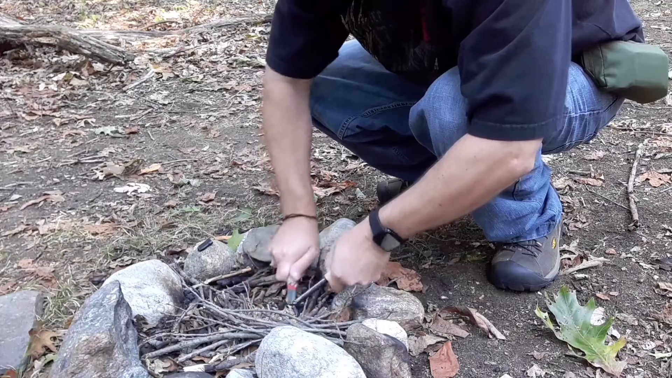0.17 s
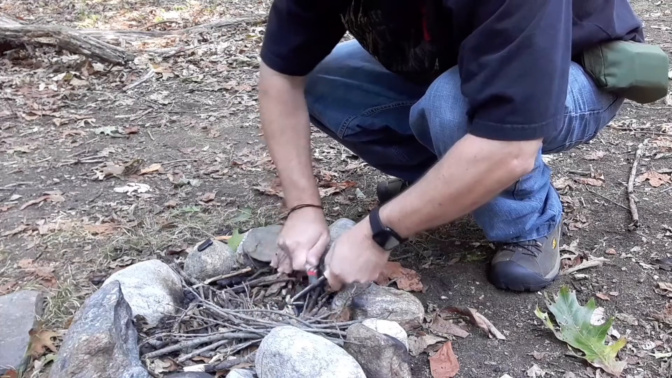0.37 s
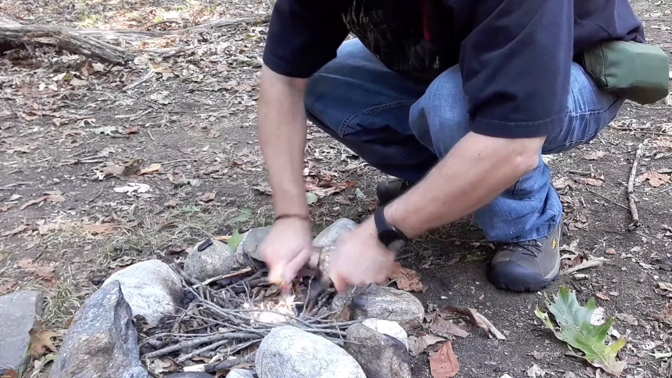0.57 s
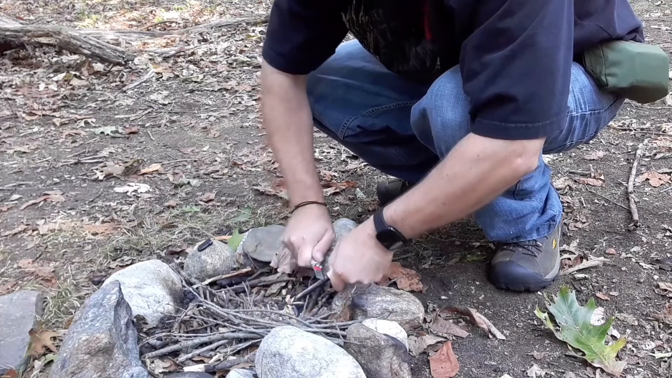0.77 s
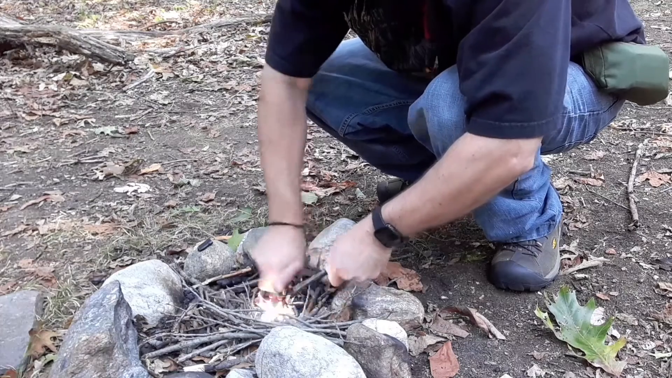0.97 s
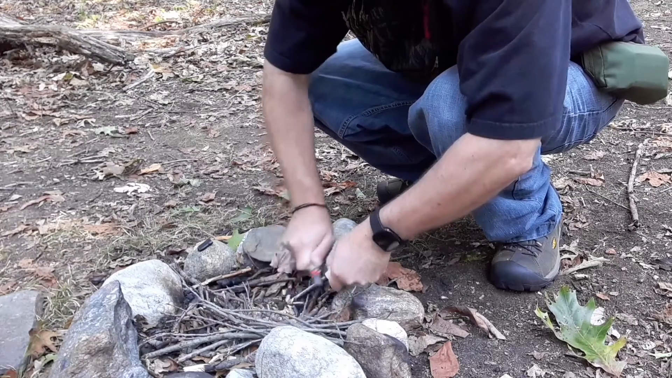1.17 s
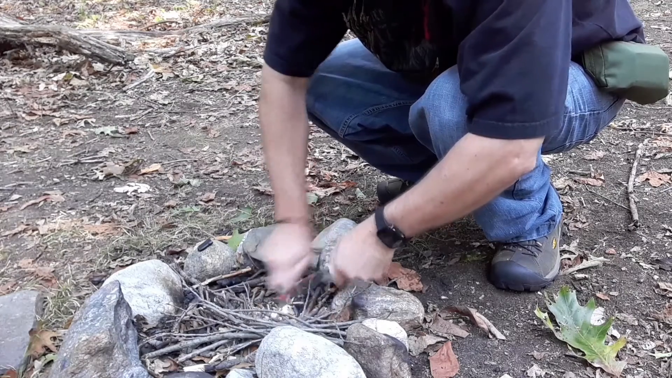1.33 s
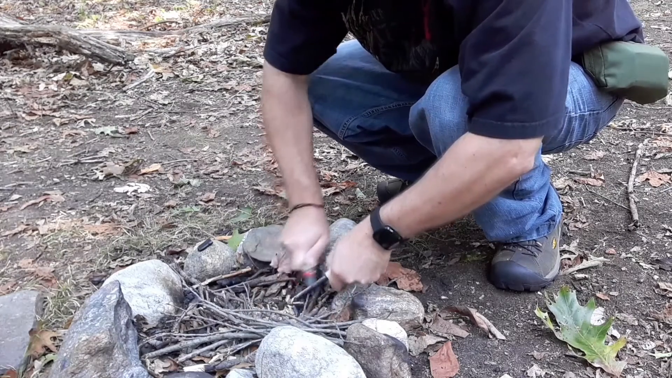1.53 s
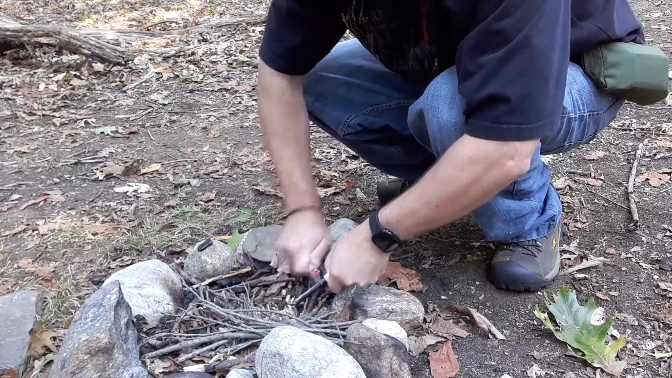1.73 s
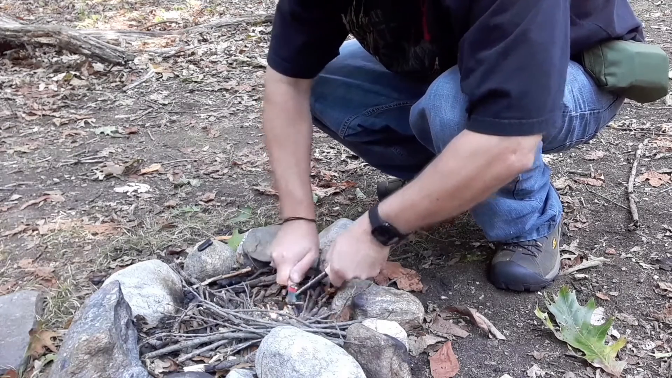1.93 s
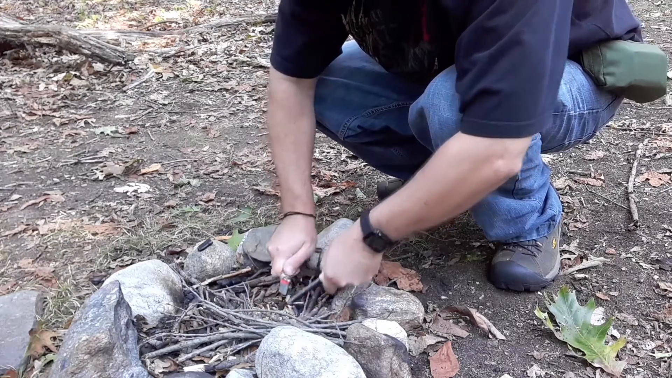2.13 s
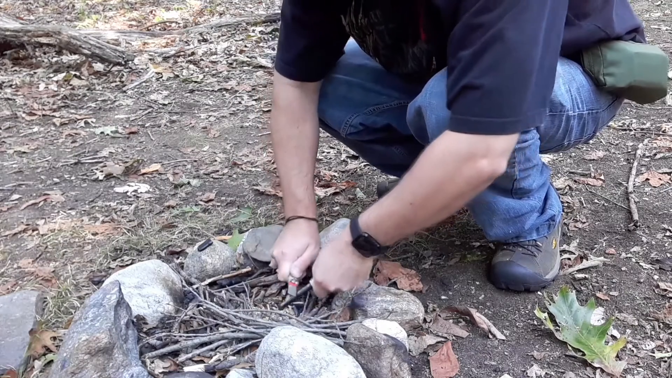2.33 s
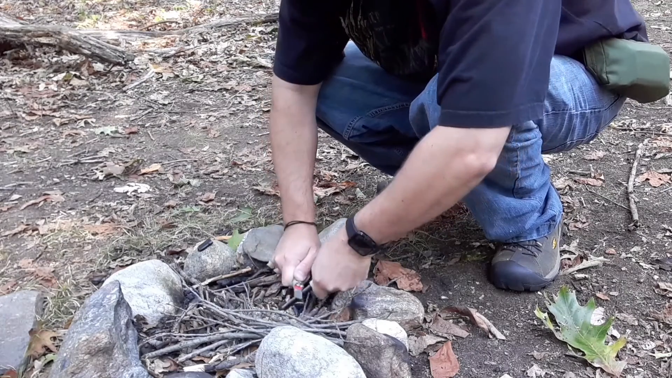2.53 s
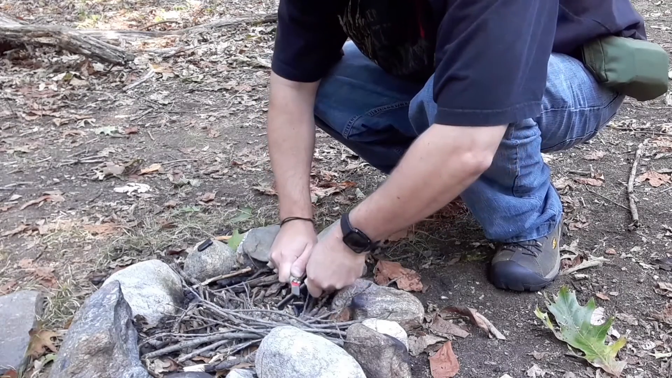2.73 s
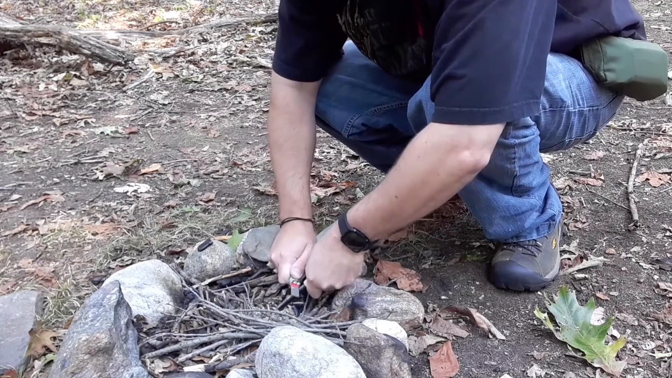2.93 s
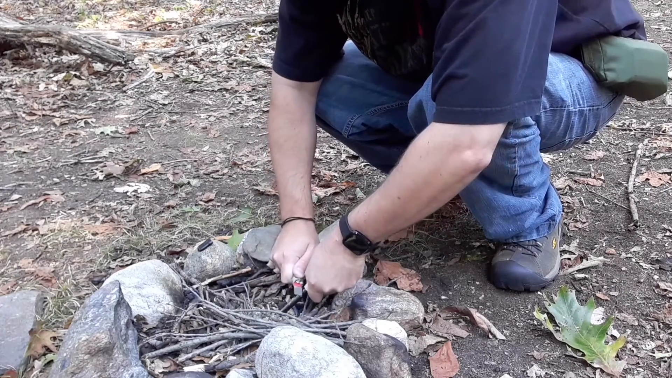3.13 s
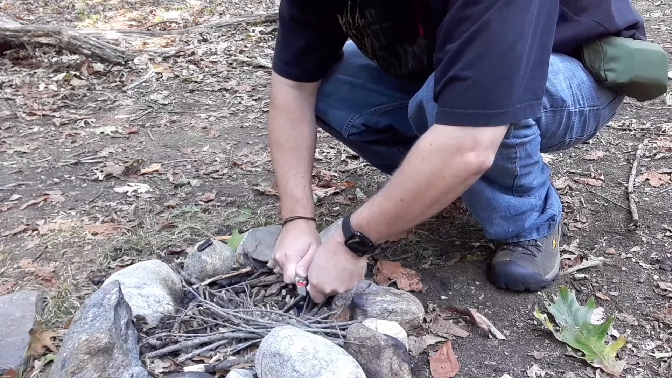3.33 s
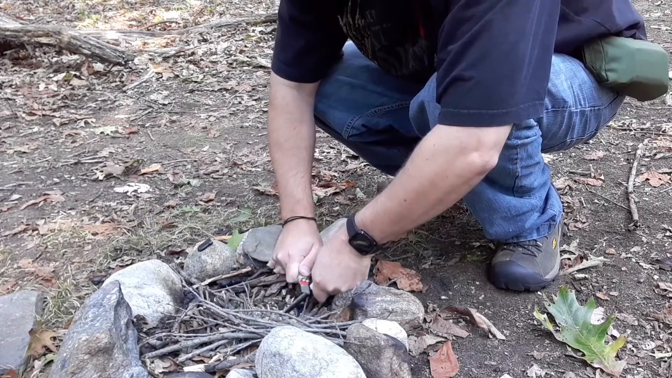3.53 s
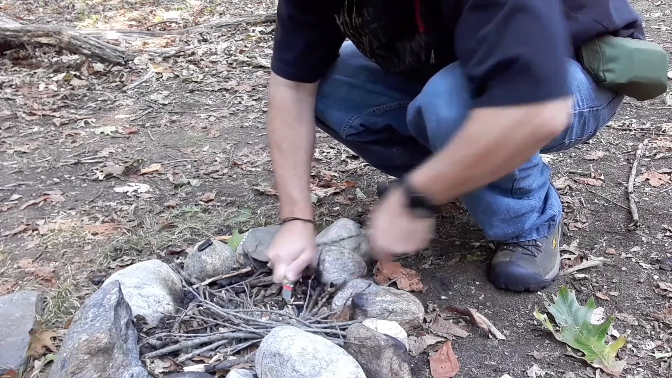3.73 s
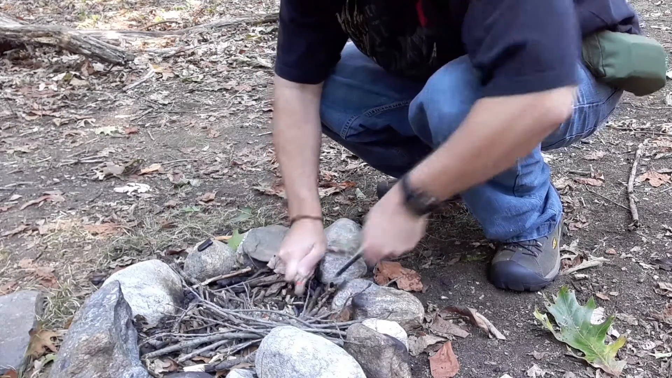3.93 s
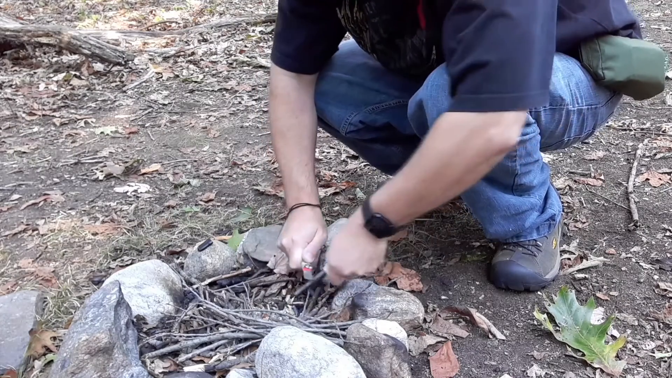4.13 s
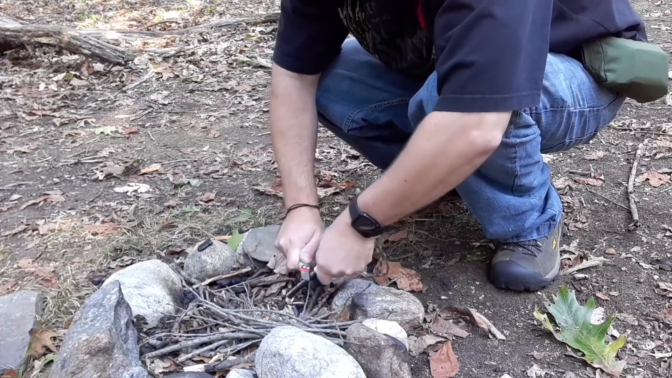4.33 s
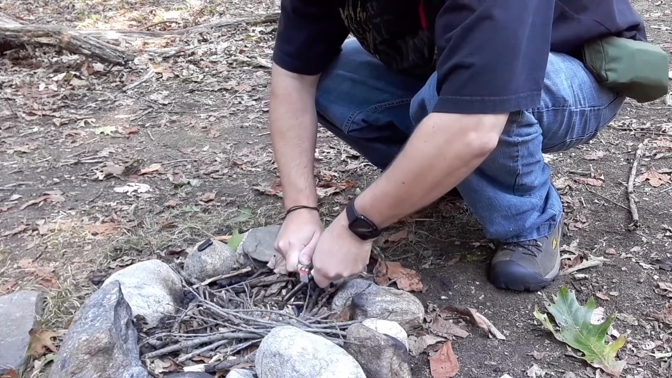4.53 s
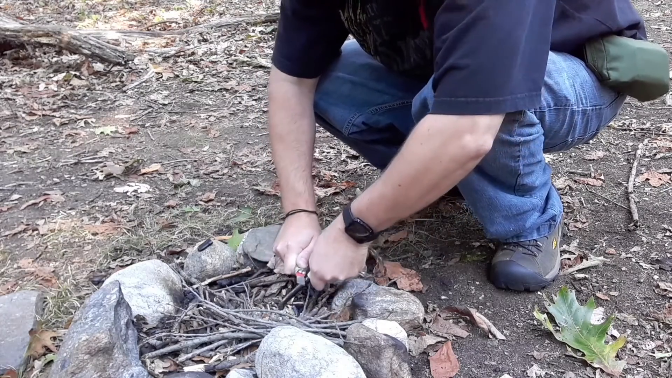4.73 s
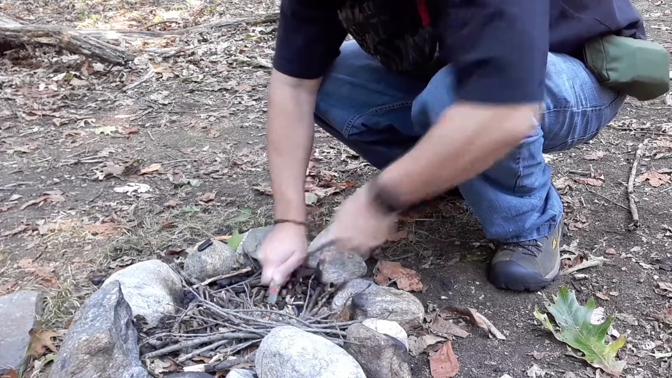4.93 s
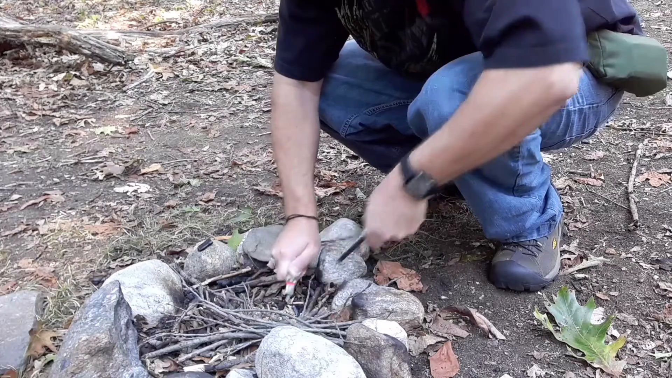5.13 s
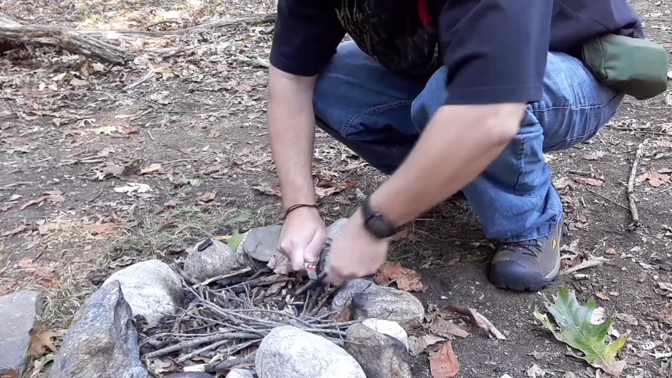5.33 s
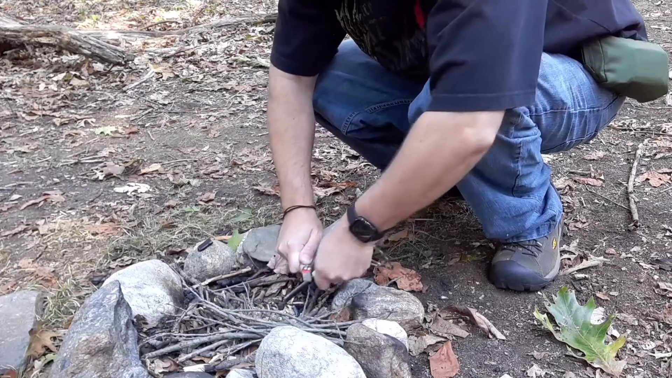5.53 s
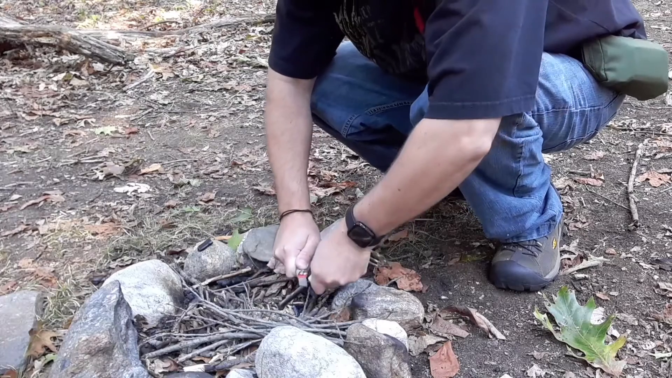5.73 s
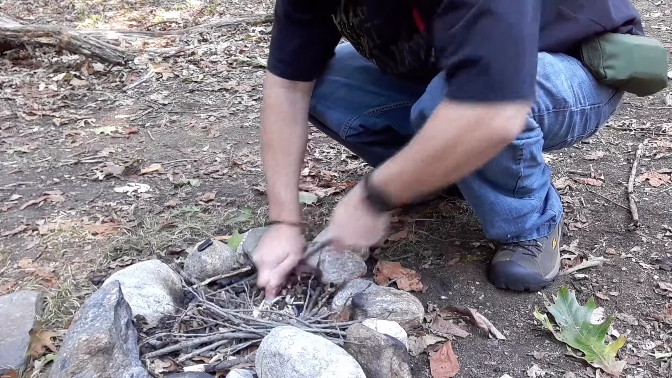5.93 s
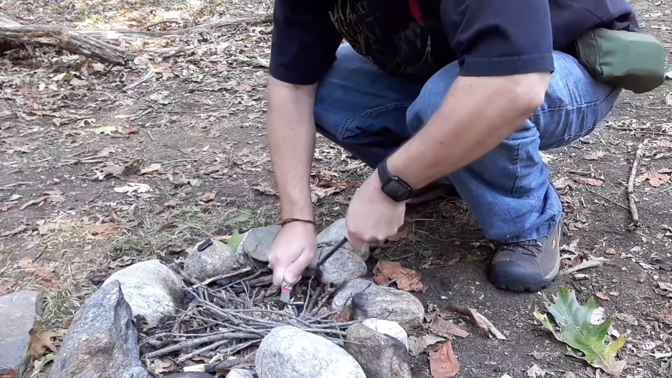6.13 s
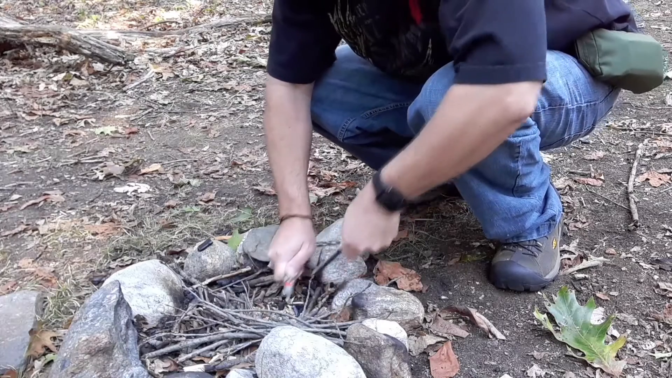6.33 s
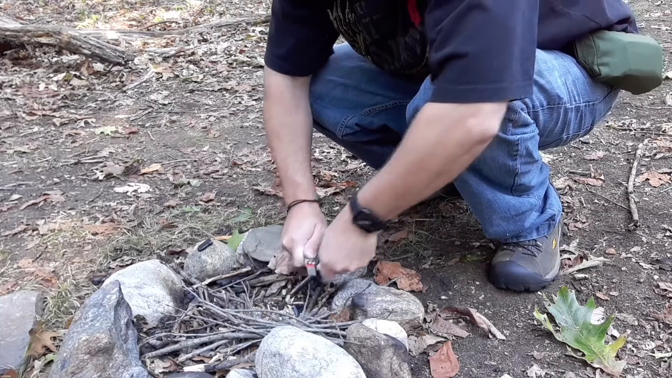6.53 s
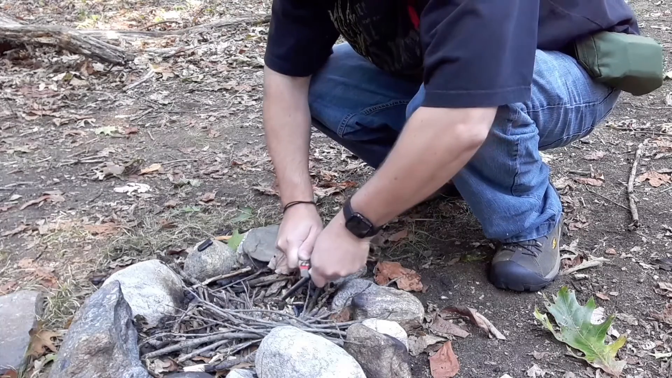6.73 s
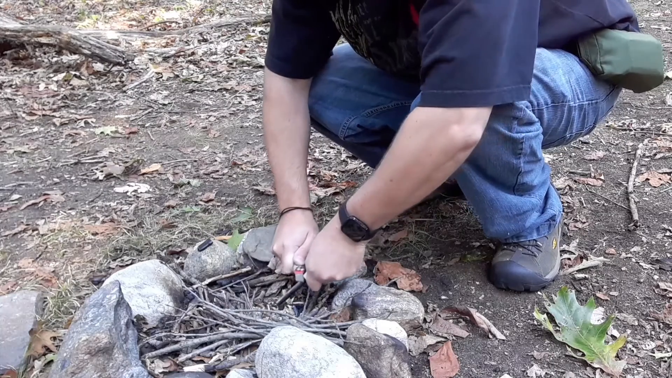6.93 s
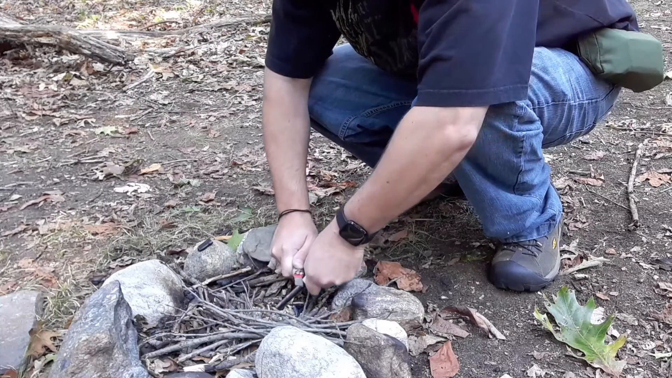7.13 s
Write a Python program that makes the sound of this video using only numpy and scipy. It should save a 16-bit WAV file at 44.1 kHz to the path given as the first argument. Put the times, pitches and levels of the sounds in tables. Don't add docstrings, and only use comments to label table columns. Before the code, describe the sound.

Short, bright metallic zips of a striker on a fire-starting rod, five quick then three widely spaced, over a constant late-summer insect chorus.

```python
import sys
import numpy as np
from scipy import signal
from scipy.io import wavfile
from scipy.ndimage import uniform_filter1d

SR = 44100
rng = np.random.default_rng(int(sys.argv[2]) if len(sys.argv) > 2 else 0)


def rack_gain(trim_db):
    fader = np.asarray(trim_db, float)
    return 10 ** (fader / 20)


def materialize(psi):
    bounded = np.clip(np.atleast_2d(psi).T, -1, 1)
    quanta = np.round(bounded * 32767).astype(np.int16)
    wavfile.write(sys.argv[1], SR, quanta)


N = 317079
TOP_HZ = 18500

# start_s, length_s, chatter_db, grit_db, first_slips_per_s
PUSH_BITES = [
    (.007, .029, -12, -24, 1200),
    (.482, .024, -17.5, -33.5, 1260),
    (.932, 0.02485, -13.5, -24.5, 1400),
    (1.325, .019, -14, -20.5, 1540),
    (1.777, .025, -14.5, -24.5, 1330),
]
PULL_BITES = [
    (3.630, .021, -15, -22.5, 1830),
    (4.881, .022, -16, -22.5, 1820),
    (5.869, 0.023, -13.5, -23.5, 1882),
]
RESET_BITES = [
    (1.153, .016, -33, -33, 1696),
    (1.562, .012, -37, -40.5, 1716),
]


def rms_one(x):
    return x / np.sqrt(np.mean(x ** 2) + 1e-20)


def column(tables, index):
    t, value, gate = np.arange(N) / SR, np.zeros(N), np.zeros(N)
    for rows in tables:
        rows = np.array(rows)
        inside = slice(max(int(rows[0, 0] * SR), 0), int(rows[-1, 0] * SR))
        value[inside] = np.interp(t[inside], rows[:, 0], rows[:, index])
        gate[inside] = 1
    return value, gate


def level(tables, index, size=44):
    gain = np.zeros(N)
    for rows in np.array(tables):
        i = np.arange(max(int(rows[0, 0] * SR), 0), int(rows[-1, 0] * SR))
        gain[i] += rack_gain(np.interp(i / SR, rows[:, 0], rows[:, index]))
    return uniform_filter1d(gain, size=size)


def at_hz(points, hz):
    points = np.array(points)
    return np.interp(np.log(hz), np.log(points[:, 0]), points[:, 1])


def drift(rate):
    r = np.exp(-2 * np.pi * rate / SR)
    wander = signal.lfilter([1], [1, -2 * r, r * r], rng.standard_normal(N + SR))
    return rms_one(wander[SR:])


def resonance(x, hz, width_hz):
    r = np.exp(-np.pi * width_hz / SR)
    zeros = np.array([1, 0, -1]) * (1 - r * r) / 2
    poles = [1, -2 * r * np.cos(2 * np.pi * hz / SR), r * r]
    return signal.lfilter(zeros, poles, x + 1e-18)


def band(x, low_hz, high_hz, order=2):
    edges_hz = [low_hz, min(high_hz, .45 * SR)]
    return signal.sosfilt(signal.butter(order, edges_hz, "band", fs=SR, output="sos"), x)


def grains(per_s, spread_db):
    sizes = rack_gain(spread_db * np.minimum(rng.exponential(1, (2, N)), 5)) * rng.choice([-1, 1], (2, N))
    return sizes * (rng.random((2, N)) < per_s / SR)


def pair(streams, alike):
    alike = np.clip(alike, -1, 1)
    side = np.sqrt(1 - alike) * streams[1] * np.array([[1], [-1]])
    return np.sqrt(1 + alike) * streams[0] + side


def strokes():
    dig_s, let_go_s, edge_db = .004, .006, -24
    judder_hz, judder_db, judder_lag_s = 98.93, 2, .005
    catch_slips = 260
    push, pull, reset = (24, 0.95, 12, 13, 1.5, -0.5), (-16, 0.1, -2, 8.5, 4.5, 3.3), (-4.5, .1, 1.5, 3, 6, -14)
    noise_shares = [(.3, .5), (.25, .95), (.6, 1.1)]
    spans = []
    for rows, law, shares in zip([PUSH_BITES, PULL_BITES, RESET_BITES], [push, pull, reset], noise_shares):
        glide, peak, swell_db, fade_db, grit_fade_db, fine_db = law
        for s, length, chatter_db, grit_db, slips in rows:
            t = np.linspace(-dig_s, length + let_go_s, num=200)
            along = np.clip(t / length, 0, 1)
            shake = judder_hz * (t - judder_lag_s)
            digging = np.clip(-t / dig_s, 0, 1)
            letting_go = np.clip((t - length) / let_go_s, 0, 1)
            edge = edge_db * np.maximum(digging, letting_go)
            grit = grit_db - grit_fade_db * (along - .5) + edge
            effort = np.interp(along, [0, np.clip(peak, 0, 1), 1], [-swell_db, 0, -fade_db])
            chatter = chatter_db + effort + edge + judder_db * np.cos(2 * np.pi * shake)
            catch = catch_slips * ((shake + .5) % 1 - .5)
            rate = slips + 1000 * glide * length * along + catch
            noise_share = np.interp(along, [0, 1], shares)
            spans.append(np.transpose([s + t, chatter, rate, grit, grit + fine_db, noise_share]))
    return spans


def rod_ring(force):
    # pitch_hz, width_hz, level_db
    rod_modes = [(1350, 350, -5), (1720, 300, 0), (2080, 350, -5)]
    rung = 0
    for k, (hz, width, db) in enumerate(rod_modes):
        rung = rung + rack_gain(db) * resonance(force, hz, width) * (-1) ** k
    return band(rung, 750, 2860, order=3)


def steel_ring(force, modes_db):
    # pitch_hz, width_hz, level_db
    steel_modes = [(3030, 200, 1), (3450, 250, 0), (5300, 250, 1), (6270, 250, -1), (7010, 200, -7),
                   (8330, 250, -3), (9100, 200, -2), (10300, 300, 5), (12350, 300, 1), (14200, 300, 1)]
    out = force.copy()
    for hz, width, db in steel_modes:
        lag = round(.22 * SR / hz)
        flare = rack_gain(db + modes_db + 4 * drift(70))
        rung = resonance(force[0] * flare, hz, width)
        out += [rung, np.roll(rung, -lag)]
    return out


def bites():
    spans = strokes()
    slips = column(spans, index=2)[0] * (1 + .035 * drift(400))
    cycle = np.cumsum(slips) / SR % 1
    grip = rack_gain(2.5 * drift(500))

    tone = np.sin(2 * np.pi * cycle) * np.sqrt(2)
    rough = rms_one(rod_ring(pair(rng.standard_normal((2, N)), .75)))
    rubbed = .85 * tone + column(spans, index=5)[0] * rough
    chatter = band(rubbed * grip * level(spans, index=1), 1050, 2600)
    chatter[0] = np.roll(chatter[0], -1)

    puff = 0.53 + np.exp(-4.0 * cycle) * 0.97
    contact = steel_ring(pair(grains(16000, spread_db=2.5), .55) * puff, modes_db=7.5)
    overtones = .45 * grip * (np.sin(4 * np.pi * cycle) + .6 * np.sin(6 * np.pi * cycle))
    grit = (.9 * rms_one(band(contact, 2600, 7000)) + overtones) * level(spans, index=3)
    fine = -rms_one(band(contact, 8300, TOP_HZ)) * level(spans, index=4)
    shed = grit * rack_gain([[.5], [-.5]]) + fine * rack_gain([[.9], [-.9]])
    return chatter * rack_gain([[.3], [-.3]]) + rack_gain(-0.25) * shed


def rubs():
    lead_s, lead_rise_db = 0.018, 15.5
    push_lead_db, other_lead_db = (-21, -21, -18), (-13, -11.5, -10)
    tail_s, tail_db, tail_fall_db = 0.092, (-12.5, -15.5, -15), np.array((35, 21, 19))
    rise_share, rub_edge_db = 0.73, -19.5
    # peak_s, length_s, rod_db, rustle_db, crackle_db
    hand_rubs = [(.066, 0.023, -70, -52, -56), (0.089, 0.033, -55, -45.5, -35.5),
                 (0.216, 0.03, -47.5, -50, -61), (0.382, 0.049, -51, -57, -55),
                 (0.469, 0.023, -40, -43, -42), (0.541, 0.043, -46.5, -36.5, -32.5),
                 (0.578, 0.063, -56, -48, -41), (.001, 0.0076, -25, -33.5, -61),
                 (0.925, 0.015, -47, -43, -35), (1.307, 0.017, -63, -46, -58),
                 (0.979, 0.038, -50, -44, -37), (1.047, .03, -58, -51, -37), (1.401, .05, -56, -64, -46),
                 (1.823, 0.037, -49, -47, -33), (2.102, .03, -53, -53, -45), (2.31, 0.078, -66, -55, -50),
                 (2.364, 0.014, -47, -47, -49), (2.421, .07, -49, -50.5, -47),
                 (2.517, 0.063, -72, -58, -50), (2.58, 0.055, -59, -59, -49), (3.655, 0.018, -38, -38, -43),
                 (4.25, 0.055, -51, -76, -76), (5.854, 0.025, -46, -42, -41),
                 (5.93, 0.088, -57, -55, -45.5)]
    spans = []
    for k, (s, length, _, grit_db, _) in enumerate(PUSH_BITES + PULL_BITES + RESET_BITES):
        lead = grit_db + np.array(push_lead_db if k < len(PUSH_BITES) else other_lead_db)
        tail, end = grit_db + np.array(tail_db), s + length
        spans.append([(s - lead_s, *(lead - lead_rise_db)),
                      (s - lead_s / 2, *(lead - lead_rise_db / 3)),
                      (s, *lead)])
        spans.append([(end, *tail),
                      (end + tail_s / 3, *(tail - tail_fall_db / 2)),
                      (end + tail_s * 1.6, *(tail - 1.7 * tail_fall_db))])
    for s, length, *db in hand_rubs:
        edge = np.array(db) + rub_edge_db
        spans.append([(s - rise_share * length, *edge), (s, *db), (s + length, *edge)])
    return spans


def slides():
    # peak_s, level_db
    knuckles = [
        (.54, -38),
        (.975, -45),
        (1.06, -49),
        (1.392, -47.5),
        (1.818, -44.5),
        (5.926, -45),
    ]
    rise_s, fall_s, edge_db = 0.034, 0.053, -17
    knocks = [[(s - rise_s, db + edge_db), (s, db), (s + fall_s, db + edge_db)] for s, db in knuckles]
    spans = rubs()
    rub = rms_one(rod_ring(grains(5000, spread_db=2.5)[0])) * level(spans, index=1, size=90)
    clumps = pair(grains(7000 * rack_gain(4 * drift(150)), spread_db=4), .2)
    rustle = rms_one(band(clumps, 2500, 9000)) * level(spans, index=2, size=90) * rack_gain(1.5)
    crackle = -rms_one(band(clumps, 9500, TOP_HZ)) * level(spans, index=3, size=90)
    soft = rms_one(band(pair(rng.standard_normal((2, N)), 0.98), 263, 600))
    thud = soft * level(knocks, index=1, size=600) * rack_gain(-4.5)
    return rub + thud + (rustle + crackle) * rack_gain([[.8], [-.8]])


def ticks():
    # start_s, rod_peak_db, clack_db and snap_db relative to the rod
    touches = [(0.0875, -46.5, -1, 26.5), (0.134, -38.5, 10.5, 5), (0.2091, -35.5, -18, -19),
               (0.2958, -31.5, 4.5, -21), (0.37, -36, -20, -21), (0.577, -46.5, 5, 21),
               (0.7559, -28, -7, -3), (1.028, -53, 3, 8), (1.0459, -48, 1, 13), (1.057, -50, 3, 11),
               (1.1507, -26, -22, -21), (1.824, -44, -1, 15), (2.104, -36, -18, -11), (2.2532, -38, 1, -16),
               (2.284, -51, -5, 20), (2.3105, -56, 6, 13), (2.325, -54, 4, 17), (2.3485, -49, 0, 14),
               (2.362, -35.5, 13, -14), (2.403, -42.5, -5, 21.5), (2.5011, -49, 3, 15), (2.443, -54, 4, 16),
               (2.5116, -54, 10, 27), (2.5315, -64, -4, 6), (2.569, -44, 0, 4), (3.418, -59, -2, 16),
               (4.1216, -31, 6.5, 5), (5.3428, -32, -28, -9), (5.375, -45, -10, -13),
               (6.5025, -26, -20, -5.5)]
    low, clack, snap = np.zeros(N), np.zeros((2, N)), np.zeros((2, N))
    t = np.arange(200) / SR
    bursts = rng.choice([-1, 1], (len(touches), 2, len(t))) * np.exp(-t / .0009)
    for (s, db, clack_db, snap_db), burst in zip(touches, bursts):
        i = round(s * SR) + 45
        low[i] = rack_gain(db + 33.5)
        clack[:, i:i + len(t)] += rack_gain(db + clack_db) * pair(burst, 0.11)
        snap[:, i:i + len(t)] += rack_gain(db + snap_db) * pair(burst, 0.34)
    ring = resonance(rod_ring(low), 1720, 1100) * rack_gain(1.5)
    overtone = rack_gain(-16) * resonance(low, 3000, 1000)
    return ring + overtone + band(clack, 2200, 8500) - band(snap, 9000, TOP_HZ)


def stones(x):
    dull = band(x, 1800, 8600, order=1)
    # delay_s, level_db, -1 where the sides swap
    echoes = [(.0021, -24, -1), (.0047, -14, 1), (.0093, -23.5, -1)]
    return sum(rack_gain(db) * np.roll(dull, round(s * SR), axis=1)[::side] for s, db, side in echoes)


def crickets(chorus_db):
    white = rng.standard_normal((4, 2, N))
    lower = rms_one(band(white[0], 3840, 3990)) * rack_gain(2.5 * drift(4))
    upper = rms_one(band(white[1], 3970, 4130)) * rack_gain(2.5 * drift(4))
    skirt = rms_one(band(white[2], 3520, 4380))
    chorus = (lower + upper + rack_gain(-2) * skirt) * rack_gain(1.5 * drift(35))
    hiss = resonance(resonance(white[3], 11950, 1000), 11950, 1000)
    far = hiss * rack_gain(1.2 * drift(37) + 2.2 * drift(1.5))
    return rms_one(chorus) * rack_gain(chorus_db + 4.0) + rms_one(far) * rack_gain(-65.5)


def songs():
    # first_pulse_s, end_s, pulses_per_s, level_db
    phrases = [
        (.162, .475, 39.8, -48),
        (2.691, 2.995, 39.5, -47.5),
        (5.481, 5.79, 39.5, -48.5),
        (1.074, 1.45, 37.5, -53.5),
        (3.724, 4.04, 36.8, -54.5),
        (6.223, 6.59, 36.8, -53),
        (5.35, 6.32, 60, -64.5),
    ]
    # pitch_hz, width_hz
    voices = [(4425, 40)] * 3 + [(11950, 450)] * 3 + [(8750, 400)]
    t, out = np.arange(N) / SR, np.zeros((2, N))
    for (first, end, per_s, db), (hz, width) in zip(phrases, voices):
        pulses = (.62 + .38 * np.cos(2 * np.pi * per_s * (t - first))) ** 1.5 * rack_gain(drift(30))
        swell = np.clip(.65 + (t - first) / .15, 0, 1)
        pulses *= swell * (t > first - .5 / per_s) * (t < end)
        noise = pair(rng.standard_normal((2, N)), .3)
        voice = rms_one(resonance(resonance(noise, hz, width), hz, width))
        steady = np.sqrt(2) * np.sin(2 * np.pi * hz * t + np.array([[0], [1.2]]))
        out += rack_gain(db) * pulses * (steady + .4 * voice if width < 100 else voice)
    return out


def chirper():
    # first_note_s, end_s, level_db
    bouts = [
        (.113, .32, -48),
        (2.193, 2.2, -51),
        (2.572, 7.1, -47),
    ]
    every_s = .20086
    t, out = np.arange(1300) / SR, np.zeros(N + 1300)
    pitch_hz = 6050 - 500 * np.clip((t - .008) / .02, 0, 1) ** 1.5
    note = np.sin(2 * np.pi * np.cumsum(pitch_hz) / SR) * np.hanning(len(t)) ** .6
    for first, end, db in bouts:
        for s in np.arange(first, end, every_s):
            i = round((s + .0015 * rng.standard_normal()) * SR)
            flutter = 1 + .35 * np.sin(2 * np.pi * (130 * t + rng.random()))
            out[i:i + len(t)] += rack_gain(db + 1.6 * rng.standard_normal()) * flutter * note
    return np.array([out[:N], np.roll(out[:N], 3)])


def air(rumble_db):
    # pitch_hz, level_db per Hz
    air_spectrum = [(15, -46), (25, -31), (68, -1.5), (92, -2.5), (161, -5.5), (249, -12.5), (754, -11.5),
                    (1130, -16), (3160, -16.5), (3920, -26), (4740, -23.5), (8590, -23.5), (9840, -38),
              (11900, -12), (16000, -26)]
    # pitch_hz, coherence
    likeness = [(35, 1), (80, 0.95), (180, 0.93), (550, 0.22), (1650, -0.16), (5000, 0.01), (15000, -0.029)]
    # pitch_hz, level_db
    lean = [(60, 4), (180, 1), (550, 0.5), (1650, 1.5), (4970, 1), (15000, 2.5)]
    out, edges = 0, 25 * 2 ** np.arange(0, 9.6, .5)
    white = rng.standard_normal((2, 2, N))
    for k, (low, high) in enumerate(zip(edges, edges[1:])):
        hz = np.sqrt(low * high)
        lean_db = at_hz(lean, hz) / 2 * np.array([[1], [-1]])
        gain = rack_gain(at_hz(air_spectrum, hz) + 0.54 * drift(23) + lean_db)
        out = out + gain * pair(band(white[k % 2], low, high), at_hz(likeness, hz))
    rumble = pair(rng.standard_normal((2, N)), .95)
    hump = resonance(resonance(rumble, 92, 40), 92, 50)
    return rack_gain(-50.5) * rms_one(out) + rms_one(hump) * rack_gain(rumble_db + 2.5 + np.array([[1], [-1]]))


def scene():
    # time_s, chorus_db, rumble_db
    woods = [(0.0, -51.5, -59.5), (1.44, -48.5, -62), (1.64, -52.5, -55), (3.68, -50, -53.5),
             (4.5, -52.5, -53), (4.73, -48.5, -54), (5.33, -54, -62), (5.79, -48.5, -54), (6.13, -56, -58),
             (6.43, -50.5, -60.5), (7.19, -54.5, -55)]
    chorus_db = column([woods], index=1)[0]
    rumble_db = column([woods], index=2)[0]
    work = bites() + slides() + ticks()
    insects = crickets(chorus_db) + songs() + chirper()
    return work + stones(work) + insects * rack_gain([[.6], [-.6]]) + air(rumble_db)


def top_cut(x):
    return signal.sosfilt(signal.butter(12, 17000, fs=SR, output="sos"), x)


def record(dry):
    rounded = 1.1 * np.tanh(dry / 1.1)
    cut = signal.sosfilt(signal.ellip(10, .5, 80, 15900, fs=SR, output="sos"), rounded)
    return top_cut(cut)


dry = scene()
out = record(dry)
materialize(out)
```